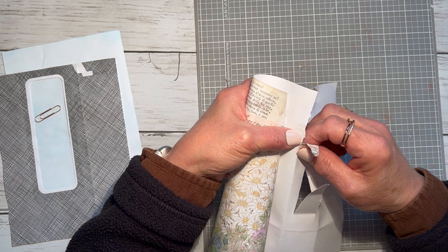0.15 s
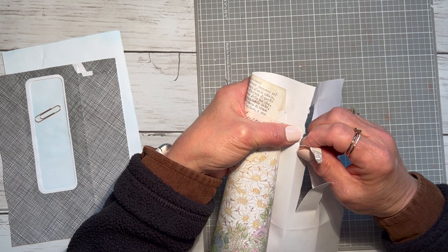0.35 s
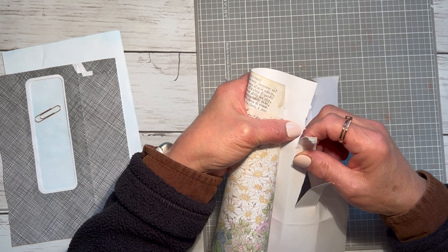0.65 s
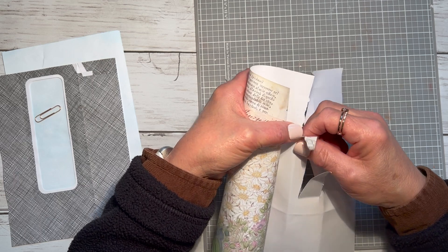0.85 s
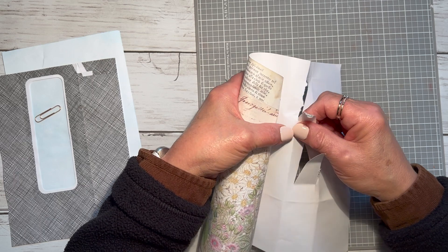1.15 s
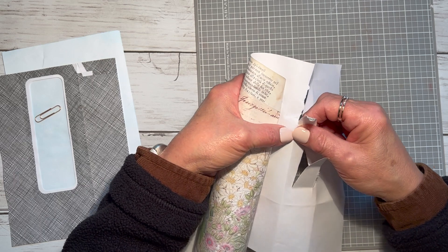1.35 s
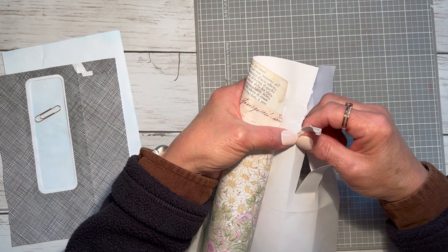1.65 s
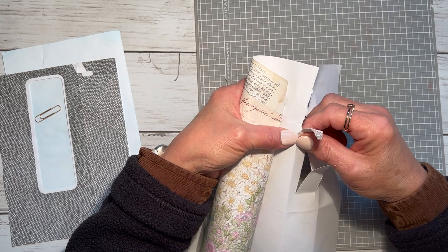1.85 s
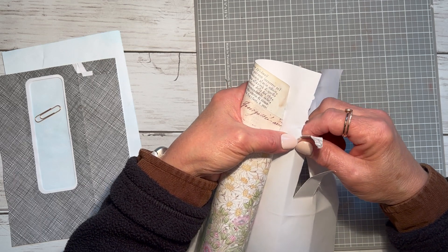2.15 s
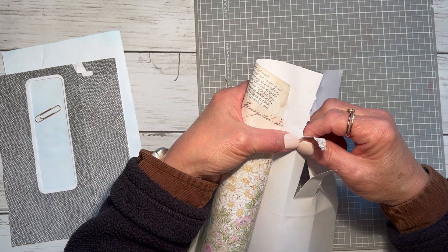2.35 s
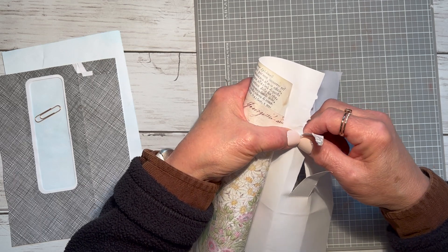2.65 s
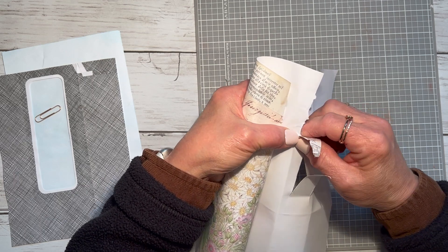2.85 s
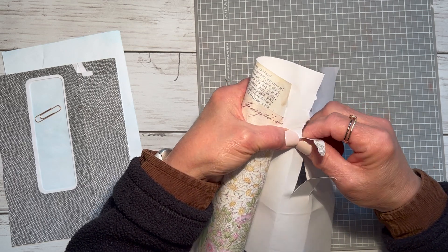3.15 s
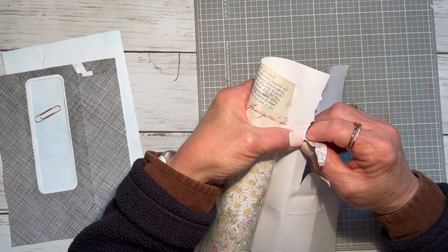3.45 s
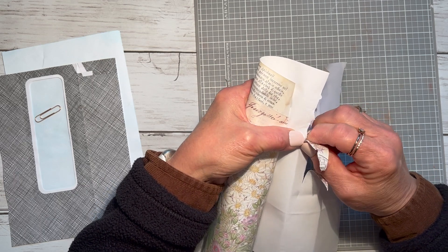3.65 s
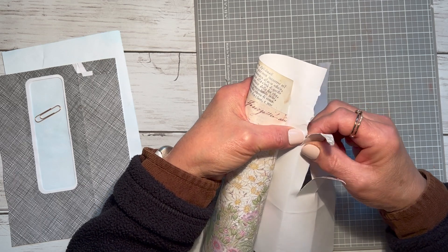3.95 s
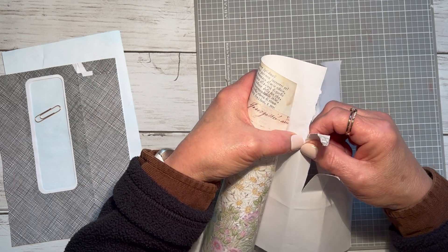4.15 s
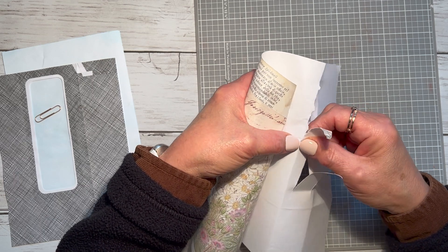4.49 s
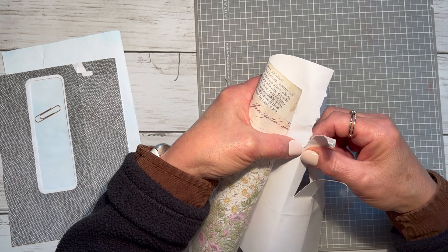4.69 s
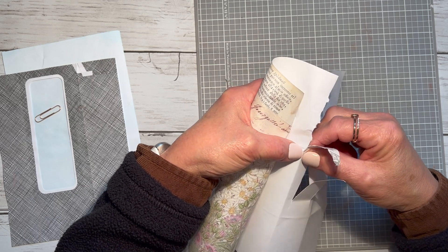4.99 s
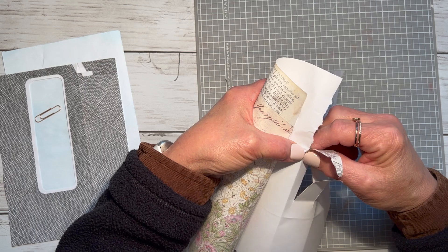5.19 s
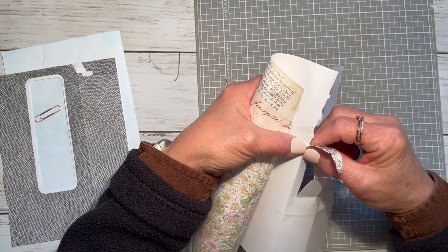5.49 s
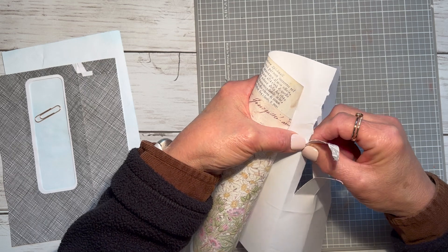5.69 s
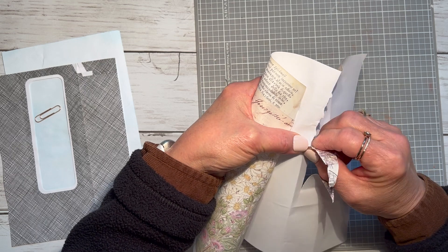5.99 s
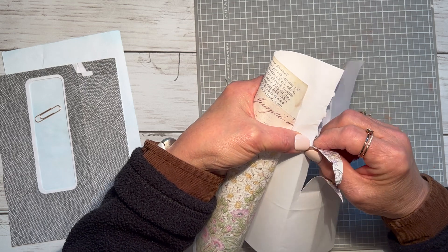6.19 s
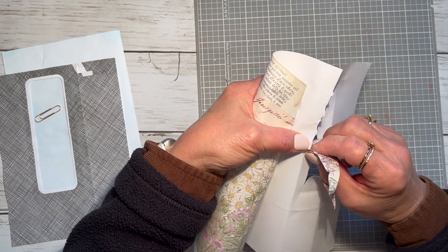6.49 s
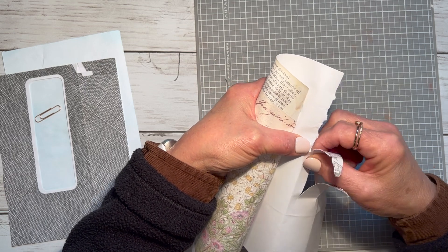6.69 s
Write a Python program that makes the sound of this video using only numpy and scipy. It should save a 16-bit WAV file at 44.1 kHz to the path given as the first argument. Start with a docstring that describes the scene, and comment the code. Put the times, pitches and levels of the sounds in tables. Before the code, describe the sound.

A curled sheet of paper is torn slowly by hand, very close to the microphones, in a quiet room with short, faint reflections. From 0 to 1.1 seconds, quick crisp rips overlap, with bright hiss, dense ticks and a few dull hollow pops. From 1.2 to 2 the tearing is softer, broken into small crackles and knocks. Between 2 and 3.2 it is sparse: light rustle, tiny pops, faint scratchy pulls. Around 3.4 to 4.3 firmer rips return, with a sharp one near 4.1. From 4.4 to 5.4 mostly isolated papery snaps sound, with thin rustling between them. A strong hollow snap comes near 5.5, then from 5.7 to the end the tearing grows busier and louder, with a sharp rip at 5.8, knocks at 5.9 and 6.1, crisp hissing pulls, and a hard crack near 6.8. A low, steady room rumble with faint wavering hum continues throughout.

```python
"""Two hands tear a folded sheet of paper bit by bit along a crease, close under a phone's microphone pair.
Trains of breaking fibres hiss in short rips and drive the modes of the curled sheet.
Buckling snaps knock and ring like a small hollow body; single fibres tick as brief bursts of noise.
Table and walls answer with sparse decaying echoes; shaped noise and two wavering tones are the quiet room."""
import sys
import numpy as np
from scipy import signal
from scipy.fft import rfft, irfft, next_fast_len
from scipy.io import wavfile
from scipy.ndimage import uniform_filter1d

SR = 44100
rng = np.random.default_rng(int(sys.argv[2]) if len(sys.argv) > 2 else 0)


def inscribe(sig):
    """Save sig as 16-bit PCM at rate SR to the path in sys.argv[1].

    A 1-D sig is mono; a 2-D sig holds one channel per row.
    Samples are clipped to [-1, 1] before scaling.
    """
    pcm = np.round(np.clip(np.atleast_2d(sig).T, -1, 1) * 32767)
    wavfile.write(sys.argv[1], SR, pcm.astype(np.int16))


N = 301379  # length in samples

# Modes of the free curled sheet, before the fingers damp it.
# Each row: frequency in Hz, level in dB, time to fall by 60 dB in s.
SHEET = [(328, -3.5, 0.06), (540, -0.5, 0.042), (645.3, 3, 0.071), (809, -0.5, 0.041), (1028, 8.5, 0.04),
         (1283, 0.5, 0.074), (1504, 5.5, 0.057), (1822, -3.5, 0.067), (2090, -10, 0.044), (2540, -17, .05)]


def gain_of(db):
    """Decibels to an amplitude factor."""
    return 10 ** (np.asarray(db) / 20)


def evened(x):
    """Scales to rms 1."""
    return x / np.sqrt(np.mean(x ** 2) + 1e-20)


def smoothed(x, width, axis=-1):
    """Two running means in a row, for slow random drift."""
    return uniform_filter1d(uniform_filter1d(x, width, axis), width, axis)


def read(points, hz):
    """Reads a table over frequency at hz, between its points on a log scale."""
    f, value = np.transpose(points)
    return np.interp(np.log(hz + 1), np.log(f + 1), value)


def add(mix, s, sound):
    """Mixes a sound in at s seconds."""
    part = mix[round(s * SR):][:len(sound)]
    part += sound[:len(part)]


def coloured(x, points):
    """Passes x through a spectrum given in dB."""
    size = next_fast_len(len(x))
    gain = gain_of(read(points, np.fft.rfftfreq(size, 1 / SR)))
    return irfft(rfft(x, size) * gain, size)[..., :len(x)]


def band(x, lo_hz, hi_hz):
    """A gentle band-pass."""
    sos = signal.butter(2, [lo_hz, min(hi_hz, SR / 2.5)], "band", fs=SR, output="sos")
    return signal.sosfilt(sos, x)


def ring(hz, db, t60):
    """Modes ringing after one blow: sines that die exponentially."""
    t = np.arange(SR // 8)[:, None] / SR
    return (gain_of(db - 60 * t / t60) * np.sin(2 * np.pi * hz * t)).sum(1)


def levels():
    """Levels of fine fibres, sheet, coarse and finest fibres: rustle and rips add as power."""
    # Rips along the crease. Each row: start, swell, hold and half the fade in seconds, pull in dB,
    # then relative to the pull in dB: sheet sounding along, coarse fibres, finest fibres.
    rips = [(0.012, 0.042, 0.062, 0.061, -61.5, -4, 2, -9), (0.038, 0.0043, 0.012, 0.018, -47, 4.5, 1.5, 6),
            (0.067, 0.012, 0.02, 0.018, -49.5, -13, -11, -3),
            (0.138, 0.061, 0.0021, 0.099, -53, -9.0, -3.5, 0.0), (0.156, 0.018, 0, 0.02, -49, -6, -12, 1.0),
            (0.158, 0.18, 0.0, 0.08, -46.5, 2, -1.0, 8.5),
            (0.424, 0.019, 0.032, 0.07, -52, -2.5, -2.5, 8.5),
            (0.552, 0.026, 0.001, 0.38, -58.5, 3.5, 1.0, -1), (0.657, 0.008, 0.013, 0.025, -64, 2.5, 2, -7),
            (0.677, 0.041, 0.0, 0.02, -48.5, 2, -3, -4), (0.75, 0.031, 0.13, 0.24, -49, -5.0, -3, -3),
            (0.795, 0.0055, 0.012, 0.022, -47, -15, -13, -3),
            (0.84, 0.16, 0.035, 0.16, -59.5, 11, 10, -1.0),
            (0.859, 0.0085, 0.025, 0.06, -47.5, 0.5, -0.5, -6), (0.978, 0.11, 0.067, 0.15, -51, 4.5, 4, -2),
            (1.173, 0.022, 0.018, 0.02, -60.5, 8, 5, 4), (1.293, 0.027, 0.0039, 0.029, -63.0, 7.5, 6.5, 6),
            (1.395, 0.021, 0.04, 0.25, -57, 7, 3.5, 1.0), (1.509, 0.071, 0.031, 0.049, -57.5, 6, 4, -1.0),
            (1.618, 0.03, 0.015, 0.21, -56, 1, 2.5, 3.5), (1.734, 0.011, 0.0035, 0.025, -54.5, -3, 3.5, 0),
            (1.773, 0.014, 0.018, 0.03, -64.5, -11, 1, -2),
            (1.973, 0.0025, 0.005, 0.031, -62.5, 7.5, 2.5, 6), (2.087, 0.16, 0.002, 0.12, -66, 1, 2, 0),
            (2.122, 0.005, 0, 0.028, -67, 8, 6, 1.0), (2.182, 0.0064, 0.0027, 0.04, -64, 4, 2, 3),
            (2.306, 0.035, 0.033, 0.057, -63.5, 2.5, 2.5, 2), (2.315, 0.142, 0.0, 0.25, -58, 3, 5, 3),
            (2.59, 0.015, 0.011, 0.29, -64.5, 7.5, 4, -4),
            (2.724, 0.049, 0.015, 0.018, -62.5, 3.5, 5.5, 2.0),
            (2.792, 0.015, 0.11, 0.076, -65.5, 4, 4, 6.5), (2.927, 0.02, 0.015, 0.02, -65.5, -8, -11, 8),
            (3.095, 0.079, 0.0062, 0.06, -59, 7.0, 4.0, -5),
            (3.185, 0.044, 0.011, 0.11, -59.0, 9.5, 5, -16),
            (3.229, 0.008, 0.005, 0.043, -55.5, 3, -1.0, -15),
            (3.306, 0.046, 0.00048, 0.027, -59.5, 8, 3, -8),
            (3.441, 0.0063, 0.0069, 0.26, -61, -4, -2.0, -1),
            (3.447, 0.0062, 0.0027, 0.023, -46.5, -5.5, -1.5, -1.0),
            (3.495, 0.036, 0.0042, 0.026, -51, -2.5, 0.0, 3.0),
            (3.608, 0.087, 0.026, 0.099, -54, -0.5, -0.5, 3),
            (3.629, 0.0075, 0.0014, 0.017, -56, -16, 5, 0), (3.654, 0.007, 0.072, 0.021, -59.5, 0, 2, 12),
            (3.75, 0.045, 0.072, 0.08, -65, 0, 0, -5), (3.833, 0.0034, 0.0013, 0.02, -52.0, -1, -5, -4),
            (3.841, 0.015, 0.059, 0.17, -65.5, 7, 4.5, -1), (3.881, 0.095, 0.01, 0.16, -60.0, 1, 2, -3),
            (3.996, 0.052, 0.2, 0.11, -57.5, 5.5, 4.5, -6), (4.083, 0.02, 0.02, 0.045, -43, -7, -3.5, -6),
            (4.124, 0.01, 0.02, 0.057, -54, 0, 0, -1), (4.28, 0.14, 0.0, 0.03, -51.5, -4, 0.0, -4),
            (4.29, 0.024, 0.2, 0.14, -62, 2.5, -1.5, 3), (4.461, 0.0024, 0.12, 0.04, -61, 9, 4.5, -6),
            (4.612, 0.011, 0, 0.041, -69, 6, 3, 3), (4.662, 0.016, 0.0035, 0.04, -74, 3, 4, -1),
            (4.75, 0.01, 0.00016, 0.092, -59, 13, 7.5, 2),
            (4.804, 0.0097, 0.012, 0.04, -63.5, 17.5, 8.5, -4),
            (4.941, 0.027, 0.014, 0.055, -54.5, 1.5, 3, -1.0),
            (5.032, 0.025, 0.21, 0.22, -70.0, 8.5, 6.5, -3), (5.12, 0.22, 0.0, 0.091, -66.0, 3, 1.0, 3.0),
            (5.123, 0.0074, 0.00076, 0.029, -66, 12, 8, -4), (5.145, 0.0068, 0, 0.03, -57, 5, 4, 2),
            (5.416, 0.051, 0, 0.14, -54.5, 6, 4.5, -7), (5.521, 0.016, 0.008, 0.036, -61.5, 11.5, 4.5, 3),
            (5.616, 0.011, 0.01, 0.023, -69.5, 6.5, 6, -2), (5.628, 0.12, 0.016, 0.029, -57.0, 7.0, 3.5, 1),
            (5.675, 0.14, 0.033, 0.28, -59.5, 10, 5.5, -4), (5.723, 0.003, 0.014, 0.021, -49, 5, 2, 3),
            (5.813, 0.0053, 0.00078, 0.025, -38, -4, -5.5, 5),
            (5.883, 0.073, 0.018, 0.056, -56.5, -4, -1, 3), (5.953, 0.11, 0.0039, 0.2, -56.5, -8, -4.0, -2),
            (6.105, 0.007, 0.015, 0.016, -59, 21, 13.5, -4.5), (6.182, 0.15, 0.0, 0.16, -53, 3, 0, 7),
            (6.192, 0.017, 0.014, 0.023, -50.5, 1, 1.5, 3), (6.234, 0.047, 0.002, 0.02, -52, -2.5, 0, 5),
            (6.344, 0.0065, 0.013, 0.018, -54.5, 3, -7, 6.0),
            (6.435, 0.036, 0.04, 0.048, -59.0, -10.0, -5.5, 3),
            (6.456, 0.18, 0.0, 0.085, -58.5, 10.5, 12, 0.0),
            (6.594, 0.014, 0.0014, 0.047, -48.5, -17, 2.5, -5),
            (6.758, 0.0028, 0.004, 0.025, -52, 18, 12, -8), (6.765, 0.026, 0.044, 0.04, -62.5, 5, 4.5, -3),
            (6.817, 0.012, 0.005, 0.04, -48, 9.0, 0.5, -7.0)]
    # Fingers holding the paper between rips. Each row: time in seconds, rustle in dB.
    rustle = [(0, -79), (1.2, -72), (1.38, -86.5), (1.8, -79), (1.951, -83.5), (2.1, -78), (2.3, -82),
              (2.6, -82), (3.05, -78), (4.6, -84.5), (4.72, -77.5), (4.8, -82), (4.92, -79.5), (5.2, -82),
              (5.37, -101), (5.498, -74), (5.6, -85), (6.83, -80)]
    layer_db = np.array([[0], [9], [6], [4]])  # relative to the rustle
    rip_shape_db = [-30.24, -0.945, 0.189, -69.615]  # at start, end of swell, end of hold, end of fade

    rustle_db = np.interp(np.arange(N) / SR, *np.transpose(rustle))
    power = gain_of(rustle_db + layer_db) ** 2
    for start, *stages, pull_db, sheet_db, coarse_db, finest_db in rips:
        swell, hold, half_fade = np.maximum(stages, 1e-4)
        corners = np.cumsum([0, swell, hold, 2 * half_fade])
        shape_db = np.interp(np.arange(0, corners[-1], 1 / SR), corners, rip_shape_db)
        for layer, db in zip(power, (0, sheet_db, coarse_db, finest_db)):
            add(layer, max(start, 0), gain_of(pull_db + db + shape_db) ** 2)
    return np.sqrt(power)


def breaks(per_s, spread_db, clump_db):
    """Fibres break at random, a few large, in clumps of some milliseconds."""
    size_db = spread_db * np.minimum(rng.exponential(1, N), 5)
    size = gain_of(size_db) * rng.choice([-1, 1], N)
    clumps = evened(smoothed(rng.standard_normal(N), 300))
    happens = rng.random(N) < per_s / SR
    return evened(size * happens * gain_of(clump_db * clumps))


def patchy(x, wide_db, narrow_db):
    """Each stretch of the crease favours its own bands: wide brief patches and narrow lasting resonances."""
    z = signal.stft(x, nperseg=256, noverlap=192)[2]
    wide, narrow = rng.standard_normal(z.shape[::-1] + (2,)).T
    # axis 0 is frequency, axis 1 is time
    wide = evened(uniform_filter1d(smoothed(wide, 10, 1), 7, 0))
    narrow = evened(uniform_filter1d(smoothed(narrow, 30, 1), 2, 0))
    z = z * gain_of(wide_db * wide + narrow_db * narrow)
    return evened(signal.istft(z, nperseg=256, noverlap=192)[1][:N])


def tearing(fine, sheet, coarse, crisp):
    """One train of breaks drives the fibre hiss in three grades and the sheet."""
    # Colours of parting fibres, coarse to finest. Each row: frequency in Hz, level in dB.
    coarse_colour = [(700, -32), (1500, -0.5), (2000, 6), (2600, 4.5), (3500, 1.5), (4300, -3.5),
                     (5000, -18.5), (6000, -72)]
    fine_colour = [(3600, -31.5), (5000, -2), (5600, -1.5), (6300, 0.5), (6570, 0.5), (6850, 0.5),
                   (9500, -5.5), (10600, -8.5), (11800, -19)]
    crisp_colour = [(9500, -54), (10600, -4), (11500, 11.5), (12700, 11), (13500, 1), (15600, 2),
                    (15900, -24), (16200, -29)]

    train = patchy(breaks(9000, 3.06, 1.75), wide_db=1.5, narrow_db=2.5)
    hz, db, t60 = np.transpose(SHEET)
    body = band(ring(hz, db, 0.19 * t60), 413, 10800)  # fingers damp the sheet while they pull
    body = body / np.linalg.norm(body)
    out = signal.oaconvolve(sheet * train, body)[:N]
    # each grade's loudness trim: (level, extra dB, colour)
    grades = ((fine, 1.5, fine_colour), (coarse, 0.7, coarse_colour), (crisp, -2.5, crisp_colour))
    for level, extra_db, colour in grades:
        out += gain_of(extra_db) * level * evened(coloured(train, colour))
    return out


def room():
    """Rumble and faint air noise, unlike in the two rows, plus two wavering tones common to both."""
    # Air of the house. Each row: frequency in Hz, relative level in dB per Hz.
    air = [(20, -16), (33, -5), (46, 2), (71, 3), (122, -1), (141, -6.5), (172, -9.5), (300, -14),
           (400, -22.5), (740, -32.5), (1500, -33.5), (3000, -47.5), (8000, -72), (15800, -45),
           (16200, -74)]
    # Wavering tones. Each row: frequency in Hz, width in Hz (twice the rms waver), peak level in dB.
    hum = [(58.14, 9.36, -56), (119.8, 8.07, -59.5)]

    noise = np.array([coloured(v, air) for v in rng.standard_normal((2, N))])
    out = gain_of(-55) * evened(noise)
    for tone_hz, width_hz, db in hum:
        drift = evened(smoothed(rng.standard_normal(N), 3000))
        wavering_hz = tone_hz + 0.5 * width_hz * drift
        out += gain_of(db) * np.sin(2 * np.pi * np.cumsum(wavering_hz) / SR)
    return out


def reflections(x):
    """Sparse taps of random sign, each band dying at its own speed; two unlike tails."""
    # Table and walls. Each row: frequency in Hz, time to fall by 60 dB in s.
    decay = [(300, 0.28), (1000, 0.18), (4000, 0.16), (12000, 0.14)]
    taps = np.zeros((2, SR // 4))
    slots = np.arange(140, SR // 4 - 20, 20)  # one tap in every 20 samples, the first after 3 ms
    places = slots + rng.integers(0, 20, (2, len(slots)))
    np.put_along_axis(taps, places, rng.choice([-1., 1.], (2, len(slots))), 1)
    hz, t, z = signal.stft(taps, SR, nperseg=256)
    fall = gain_of(-60 * t / read(decay, hz)[:, None])
    tail = signal.istft(z * fall, SR, nperseg=256)[1]
    tail = tail / np.linalg.norm(tail, axis=1, keepdims=True)
    return signal.fftconvolve(x[None], tail, axes=1)[:, :N]


def snaps():
    """A patch buckles: a crack and a knock of a few cycles, then the modes near its pitch swell and ring on."""
    # Buckling snaps. Each row: start in seconds, drive of the sheet in dB, nominal pitch of the patch in Hz,
    # peak of the crack in dB, drive of the thud of the whole roll in dB.
    buckles = [(0.042, -31, 1350, -33, -60), (0.263, -36, 579, -49, -43.5), (0.296, -38, 1050, -35, -56),
               (0.312, -31, 1270, -55, -58), (0.436, -42.5, 1220, -48, -49), (0.577, -31, 600, -32, -34.5),
               (0.669, -46, 1320, -42, -49), (0.711, -46, 1400, -54, -52), (0.803, -52, 1440, -52, -65),
               (0.872, -35.5, 1040, -41, -46), (0.997, -48, 1580, -57, -66), (1.201, -38, 620, -47, -56),
               (1.317, -43, 590, -43, -65), (1.419, -32.5, 720, -41.5, -53), (1.444, -41, 740, -42, -52),
               (1.488, -36, 630, -48, -65), (1.538, -39.5, 885, -51, -57), (1.564, -44, 1420, -38, -59),
               (1.594, -34.5, 790, -57, -49), (1.678, -43, 692, -36.5, -50.5),
               (1.845, -43.5, 700, -50.5, -51), (1.895, -46.5, 680, -52.5, -68),
               (1.977, -41, 545, -41.5, -56), (2.17, -50, 1040, -54, -55), (2.191, -44.5, 690, -48, -55),
               (2.347, -36, 680, -43, -62), (2.471, -44, 895, -52, -61), (2.549, -39.5, 660, -67, -52),
               (2.611, -44, 524, -53, -62), (2.657, -43.5, 673, -47, -53), (3.171, -47, 900, -46, -60),
               (3.224, -36, 1550, -56, -58), (3.348, -47, 1180, -48, -63), (3.453, -45, 950, -42, -76),
               (3.637, -55, 1290, -45.5, -71), (3.66, -41.5, 466, -50, -63),
               (3.837, -41.5, 1380, -40.5, -65), (4.045, -37.5, 1450, -45, -55),
               (4.087, -33.5, 1630, -51, -66), (4.373, -45, 660, -36, -63), (4.425, -31.5, 630, -58, -80),
               (4.455, -37, 900, -49, -65), (4.509, -37, 620, -62, -65), (4.626, -44, 680, -51, -70),
               (4.766, -33, 620, -33, -65), (4.815, -28.5, 920, -47, -46.5), (4.954, -48, 600, -45, -69),
               (4.969, -40.5, 1640, -43, -64), (5.065, -47, 666, -43, -70), (5.13, -29, 960, -36.5, -53),
               (5.425, -54, 1020, -51, -68), (5.445, -43, 988, -52, -57), (5.458, -22, 855, -34, -49),
               (5.52, -37, 634, -61, -56), (5.701, -29.5, 1040, -39.5, -44),
               (5.817, -29.5, 735, -45, -40.5), (5.879, -25, 600, -31, -39), (6.113, -24, 615, -60, -55),
               (6.203, -40.5, 1390, -41, -65), (6.647, -41, 644, -43, -60), (6.721, -48, 950, -58, -55),
               (6.762, -23, 940, -27.5, -51)]
    out, t = np.zeros(N), np.arange(SR // 8) / SR
    hz, db, t60 = np.transpose(SHEET)
    detune = rng.uniform(0.842, 1.03, (len(buckles), len(hz)))
    noise = rng.standard_normal((len(buckles), 512))
    thud = 1.42 * ring(np.array([270.]), 0, 0.027) * (1 - np.exp(-t / 0.0009))
    for (s, sheet_db, patch_hz, crack_db, thud_db), bend, puff in zip(buckles, detune, noise):
        near_db = -9.0 * abs(np.log2(hz / patch_hz))  # modes far from the patch's pitch stay weak
        body = ring(hz * bend, db + near_db, t60 * 0.55)  # the fingers shorten the free ring
        body = body * (1 - np.exp(-t / 0.0028))
        knock = ring(np.array([1.031 * patch_hz]), 0, 0.012) * (1 - np.exp(-t / 0.00088))
        add(out, s, gain_of(sheet_db) * band(0.51 * body / abs(body).max() + 1.47 * knock, 405, 9100))
        add(out, s, gain_of(thud_db) * thud)
        crack = band(puff * gain_of(-60 * t[:512] / 0.016), 940, 4340)
        add(out, s, gain_of(crack_db) * crack / abs(crack).max())
    return out


def ticks(finest):
    """A fibre snaps as a wide click strongest at its own pitch; random smaller ones follow the finest level."""
    # Single fibres that snap sharply. Each row: start in seconds, peak in dB before the last colouring,
    # pitch in Hz.
    sharp = [(0.0424, -14, 12500), (0.1692, -28, 10000), (0.176, -22, 11300), (0.2653, -32, 13100),
             (0.279, -20, 12900), (0.294, -23, 12700), (0.318, -17, 11000), (0.3278, -32, 12300),
             (0.336, -17.5, 12600), (0.3403, -19, 12700), (0.354, -25, 12500), (0.4371, -23, 11700),
             (0.449, -20.5, 11100), (0.48, -22, 12400), (0.5786, -21.5, 10800), (0.67, -41, 9200),
             (0.712, -36, 10200), (1.557, -29.5, 8240), (1.5842, -28.5, 9400), (1.647, -32, 10200),
             (1.652, -35, 10300), (1.7245, -32, 10200), (1.7448, -28.5, 7700), (2.1254, -39, 13100),
             (2.189, -33.5, 12000), (2.3463, -32, 9050), (2.796, -34, 13400), (2.869, -33.5, 13100),
             (2.9156, -32.5, 9100), (3.2332, -44, 7500), (3.2418, -31, 6900), (3.458, -33, 7700),
             (3.493, -36, 10900), (3.6378, -33, 7300), (3.66, -19, 12600), (3.687, -22, 13700),
             (3.7, -25, 13700), (3.7204, -33, 12300), (3.73, -25, 12400), (3.742, -34, 11300),
             (3.8362, -27, 8100), (3.8446, -27, 10300), (4.101, -34, 9200), (4.107, -20.5, 7900),
             (4.466, -27, 9420), (5.0829, -41, 10700), (5.153, -32, 9600), (5.21, -37, 12400),
             (5.2407, -39, 10900), (5.259, -30.5, 12100), (5.285, -26.5, 12600), (5.4587, -33, 8150),
             (5.789, -24.5, 12000), (5.817, -25.5, 8750), (5.822, -25, 9900), (5.89, -28.5, 11000),
             (5.917, -25, 12500), (5.9698, -25, 12000), (6, -22.5, 9800), (6.2025, -29.5, 9600),
             (6.306, -25, 12700), (6.325, -22, 11700), (6.354, -32, 13750), (6.3592, -27.5, 12400),
             (6.7637, -34, 7140)]
    # Lowest and highest pitch of the small ticks [Hz].
    small_range = (8260, 13600)
    small_per_s = 25
    least_db, spread_db = 12.5, 3.5  # small peaks over the finest level: least, and mean excess above that

    out, t = np.zeros(N), np.arange(256) / SR
    puffs = rng.standard_normal((len(sharp) + 400, 256))
    wait, size, pitch = rng.random((400, 3)).T
    when = np.cumsum(-np.log(wait)) / small_per_s
    finest_db = 20 * np.log10(finest[np.minimum(when * SR, N - 1).astype(int)])
    small_db = finest_db + least_db - spread_db * np.log(size)
    small = zip(when, small_db, np.interp(pitch, (0, 1), small_range))
    every = list(sharp) + [row for row in small if row[0] < N / SR]
    for (s, level_db, tick_hz), puff in zip(every, puffs):
        puff = puff * gain_of(-60 * t / 0.007)
        pitched = band(puff, 0.72 * tick_hz, min(1.25 * tick_hz, 15800))
        tick = pitched + 1.04 * band(puff, 1560, SR / 2.5)
        add(out, s, gain_of(level_db) * tick / abs(tick).max())
    return coloured(out, [(7000, -6.5), (11500, -6.0), (15700, 2.0), (16400, -19)])  # (Hz, dB)


def scene():
    """Row 0 reaches both ports, row 1 is what differs between them."""
    level = levels()
    paper = tearing(*level) + snaps() + ticks(level[-1])
    near, around = reflections(paper)
    return np.array([paper + gain_of(-12.5) * near, around]) + room()


def record(dry):
    """Two microphone ports with their own phase and balance, then the upper band limit."""
    # Left port's lead over the right for the shared sound. Each row: frequency in Hz, lead in turns.
    lead = [(3900, 0), (4480, -.03), (4820, -.24), (5340, -.94), (5700, -.99), (7500, -1), (8350, -1.1),
            (12800, -1.42), (13300, -1.47), (16500, -1.47)]
    # Sound that differs between the ports. Each row: frequency in Hz, gain in dB.
    apart = [(60, -49), (140, -18.5), (330, -11), (600, -12), (900, -11), (1300, -17), (1800, -44.5),
             (4000, -26.5), (5000, -12), (6000, -25.5), (8000, -14), (10000, -10), (16000, -7)]
    # Left minus right for the shared sound. Each row: frequency in Hz, difference in dB.
    louder = [(150, 0), (260, -2.4), (550, -3), (900, -1.6), (1700, 0)]

    size = next_fast_len(N)
    hz = np.fft.rfftfreq(size, 1 / SR)
    shared, unshared = rfft(dry, size)
    unshared = unshared * gain_of(read(apart, hz))
    # each port takes half of the difference in level and phase
    tilt = gain_of(read(louder, hz) / 2) * np.exp(1j * np.pi * read(lead, hz))
    ports = irfft(np.array([shared * tilt + unshared, shared / tilt - unshared]), size)[:, :N]
    low_pass = signal.firwin(511, 16900, window=("kaiser", 9), fs=SR)  # edge in Hz
    return signal.oaconvolve(ports, low_pass[None], "same")


dry = scene()
out = record(dry)
inscribe(out)
```